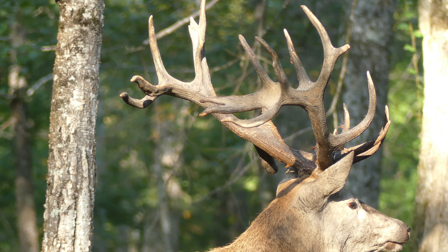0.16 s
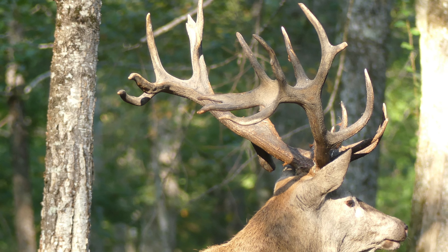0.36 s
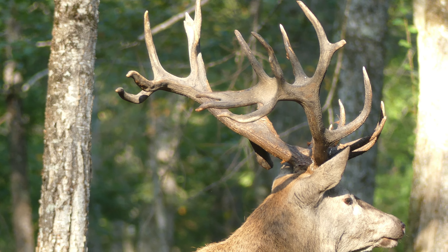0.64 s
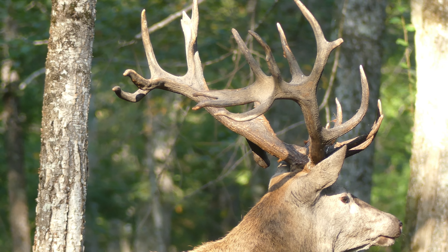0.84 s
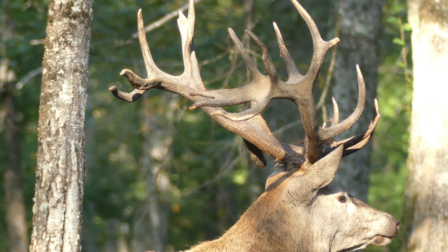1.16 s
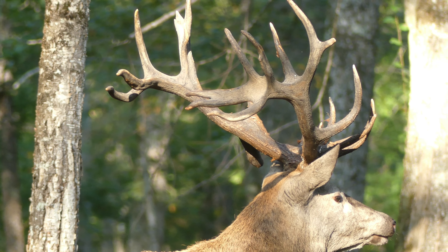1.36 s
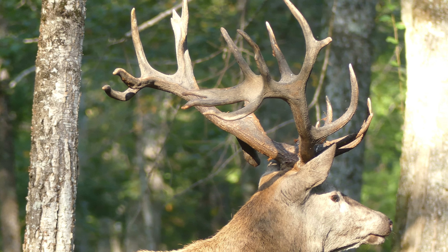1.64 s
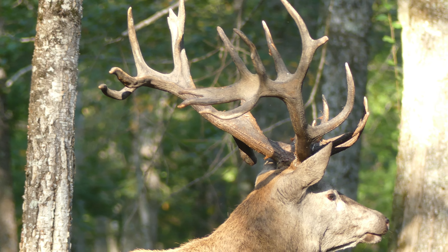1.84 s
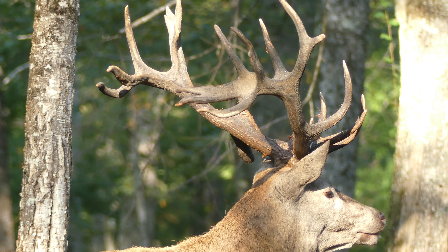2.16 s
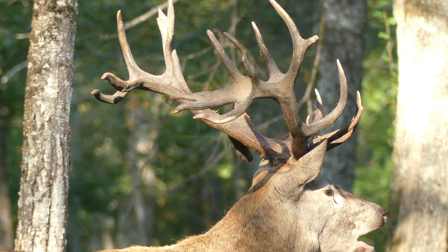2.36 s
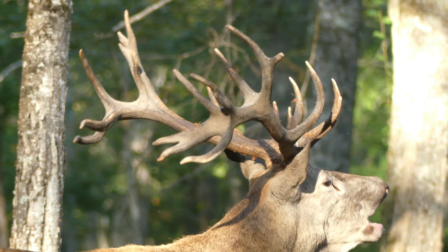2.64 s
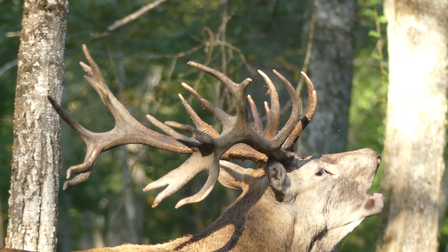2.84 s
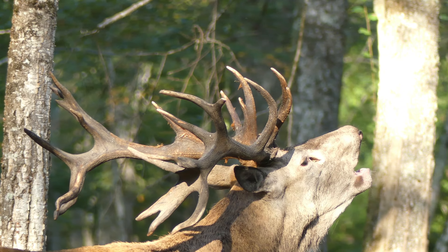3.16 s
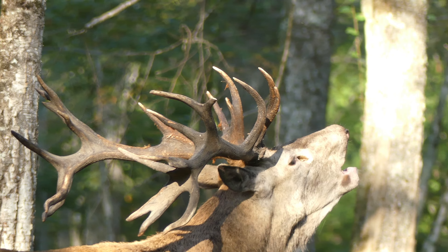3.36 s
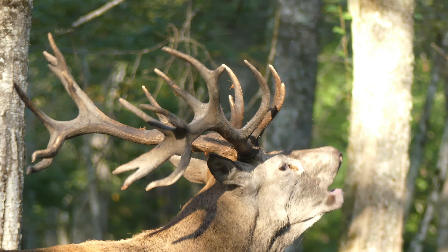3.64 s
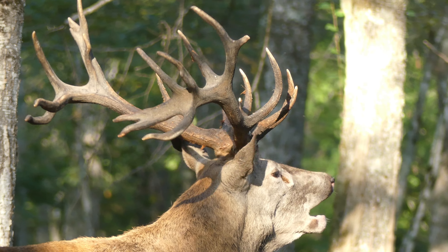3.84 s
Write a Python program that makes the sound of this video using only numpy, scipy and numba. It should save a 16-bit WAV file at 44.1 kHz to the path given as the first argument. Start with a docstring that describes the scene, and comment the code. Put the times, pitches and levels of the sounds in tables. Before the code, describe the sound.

After faint rumble, microphone hiss and barely audible insects, a single stag bellow starts muffled, opens with a nasal hiss, arches up in pitch and drops away, echoing off the trunks; heard clearly, mostly central.

```python
"""A quiet forest: far rumble, microphone hiss, faint insects and the fading echo of an earlier roar, all of
shaped noise. At 2.5 s a stag roars once: vocal fold pulses and breath excite chest and mouth resonances,
muffled at first. A nasal hiss joins and the mouth opens; the larynx drops, so most throat resonances sink
while the pitch arches up and falls. From 30 ms behind the voice the trunks answer with a long echo."""
import sys
import numpy as np
from scipy import signal
from scipy.fft import rfft, irfft, next_fast_len
from scipy.io import wavfile
from scipy.ndimage import uniform_filter1d, map_coordinates
from numba import njit

SR = 44100
rng = np.random.default_rng(int(sys.argv[2]) if len(sys.argv) > 2 else 0)


def nominal_scale(level):
    """Amplitude ratio for a level in decibels (scalar or array-like)."""
    x = np.asarray(level, float) / 20
    return 10 ** x


def bounce(signal):
    """Save signal as a 16-bit WAV file at the path given by the first command-line argument."""
    frames = np.transpose(np.atleast_2d(signal))
    limited = np.clip(frames, -1, 1)
    pcm = np.round(limited * 32767).astype(np.int16)
    wavfile.write(sys.argv[1], SR, pcm)


N = 176400  # samples, 4 s


def unit(x):
    """Normalisation: the signal scaled to rms 1."""
    return x / np.sqrt(np.mean(x ** 2) + 1e-20)


def along(points, hz):
    """Interpolation of (frequency [Hz], value) points on a logarithmic frequency axis."""
    f, value = np.transpose(points)
    return np.interp(np.log(hz + 1), np.log(f + 1), value)


def curves(rows):
    """Linear interpolation in time: one value per sample for each column after the time."""
    time, *columns = np.transpose(rows)
    return [np.interp(np.arange(N) / SR, time, column) for column in columns]


def wobble(rate):
    """Band-limited random modulation: a smooth curve through `rate` random knots a second."""
    knots = rng.standard_normal(int(N * rate / SR) + 4)
    return map_coordinates(knots, [np.arange(N) * rate / SR])


def filtered(x, response):
    """Linear filtering: the spectrum is multiplied by a response of frequency."""
    size = next_fast_len(N + SR // 2)
    hz = np.fft.rfftfreq(size, 1 / SR)
    return irfft(rfft(x, size) * response(hz), size)[..., :N]


def noise(response):
    """Spectral shaping: white noise coloured by a response, at rms 1."""
    return unit(filtered(rng.standard_normal(N), response))


# Pitch of the vocal folds: (time [s], pitch [Hz])
PITCH = [(2.52, 99.34), (2.662, 115.4), (2.7, 124.6), (2.74, 140.1), (2.786, 153.7), (2.874, 188.1),
         (2.904, 197.3), (3.026, 203.2), (3.06, 210.5), (3.104, 207.1), (3.248, 223.5), (3.3, 222),
         (3.362, 212.8), (3.452, 215.6), (3.504, 204.7), (3.544, 196.6), (3.598, 173.5), (3.655, 160.2),
         (3.692, 140.3), (3.762, 97.86), (3.8, 81.8)]


def vocal_folds(start, end):
    """Glottal excitation: periodic pulses, and turbulent noise that swells once a cycle with the folds."""
    jitter, shimmer_db = 0.004, 1.57  # scatter of pitch (fraction) and of pulse size (dB)
    pitch, = curves(PITCH)
    turns = np.cumsum(pitch * (1 + jitter * wobble(60))) / SR
    pitch, turns = pitch[start:end], turns[start:end]
    harmonic = np.arange(1, 45)[:, None]
    audible = harmonic * pitch < 7000  # Hz
    pulses = np.sum(np.cos(2 * np.pi * harmonic * turns) * audible, 0)
    pulses = unit(pulses * nominal_scale(shimmer_db * wobble(90)[start:end]))
    puffs = unit(rng.standard_normal(end - start) * (1.3 + np.cos(2 * np.pi * turns)))
    return pulses, puffs * np.sqrt(SR / 14000)  # about rms 1 within the 7 kHz band of the pulses


def blend(pulses, puffs, share):
    """Power addition of uncorrelated sources: breath takes `share` of the power."""
    return np.sqrt(1 - share) * pulses + np.sqrt(share) * puffs


@njit
def ring(x, turn, keep, gain):
    """Parallel resonance: steep two-stage resonators whose pitch may move from sample to sample."""
    out = np.zeros(len(x))
    for k in range(len(keep)):
        y = z = 0j
        for i in range(len(x)):
            y = y * keep[k] * turn[k, i] + x[i]
            z = z * keep[k] * turn[k, i] + y
            out[i] += gain[k, i] * z.real
    return out


def throat(source, table, shortness, lift_db=0):
    """Source-filter principle: resonances scale with throat shortness; the result is levelled over time."""
    hz, width, db = np.transpose(table)[..., None]
    keep = np.exp(-np.pi * width / SR)
    # alternating signs below 1500 Hz: neighbouring resonances cancel between their peaks
    sign = (-1.0) ** np.cumsum(hz < 1500, axis=0)
    gain = nominal_scale(db + lift_db + 0 * source) * (1 - keep) ** 2 * sign
    turn = np.exp(2j * np.pi * hz * shortness / SR)
    y = ring(source, turn, keep[:, 0], gain)
    power = uniform_filter1d(uniform_filter1d(y ** 2, size=2600), size=2600)
    return y / np.sqrt(np.abs(power) + 1e-20)


# Levels: (time [s], chest level [dB], mouth level [dB], strain: top resonances over the mouth level [dB])
ROAR = [(2.48, -47.5, -87, -23), (2.6, -44, -87, -32), (2.66, -33.5, -41.5, -20.5), (2.7, -33, -45, -28.5),
        (2.738, -24.5, -33, -14), (2.756, -28.5, -15, -28), (2.82, -24.5, -15.5, -19),
        (2.87, -14, -23, -21.5), (2.95, -17, -21, -15), (3.05, -17, -20, -15), (3.12, -17.5, -23, -8),
        (3.2, -23.5, -20, -7.5), (3.28, -23, -17, -14.5), (3.35, -26, -19, -10), (3.43, -26.5, -20, -14),
        (3.5, -22, -20.5, -8), (3.56, -18, -23.5, -22), (3.6, -9.5, -49.5, -21), (3.66, -20.5, -29.5, -5.5),
        (3.7, -20.5, -22, -11), (3.77, -15.5, -36, -12), (3.795, -17, -63, -11), (3.803, -74, -78, -9)]
# Breath in the source: (time [s], share of the power in the mouth tone [0-1])
BREATH = [(2.7, .15), (2.8, .11), (3.1, .06), (3.5, .035), (3.62, .05), (3.7, .12), (3.8, .1)]
# The larynx drops: (time [s], resonance pitch over that of the full-length throat [ratio])
SHORTNESS = [(2.6, 1.24), (2.76, 1.21), (2.82, 1.18), (2.87, 1.12), (2.95, 1.05), (3.1, 1.02), (3.3, 1.005),
             (3.55, 1.0)]
# Chest resonances at full length: (frequency [Hz], width of each stage [Hz], relative level [dB])
CHEST = [(186.2, 52.6, 11), (332.6, 119, 2)]
# Mouth resonances at full length: (frequency [Hz])
MOUTH_HZ = [445, 782, 1170, 1350, 1625, 1900, 2290, 2545]
# The same resonances: (width of each stage [Hz], relative level [dB],
# how strongly it follows the larynx [power of the ratio], gain per unit of extra shortness [dB])
MOUTH = [(86, -1, 1.2, -6.5), (70.2, 2, 1.195, -3), (85, -1.5, 0.56, 37), (76, -5, 0.6, -54),
         (84, 3, 0.95, 27), (82.5, 5, 1.12, 11), (161, -5, 0.66, 55), (130, -5, .5, 2)]
# Top resonances at full length: (frequency [Hz], width of each stage [Hz], relative level [dB])
TOP = [(2910, 250, 7.5), (3382, 244, 7.5), (3600, 195, 0.5), (4620, 260, -8), (5030, 520, -15),
       (6730, 1300, -25.5)]


def stag():
    """Source-filter voice: one glottal source drives chest, mouth and top resonances as the larynx drops."""
    chest_slide, top_slide = -0.15, 0.15  # powers of the ratio; a short throat pulls the chest tone down
    chest_breath, top_breath = 0.12, 3  # breath amplitude left in the chest; times the breath power on top
    start, end = round(ROAR[0][0] * SR), round(ROAR[-1][0] * SR)
    chest_db, mouth_db, strain_db = [curve[start:end] for curve in curves(ROAR)]
    share = curves(BREATH)[0][start:end]
    shortness = curves(SHORTNESS)[0][start:end]
    pulses, puffs = vocal_folds(start, end)

    chest_source = blend(pulses, puffs, share * chest_breath ** 2)
    chest = throat(chest_source, CHEST, shortness ** chest_slide)

    width, level, slide, lift = np.transpose(MOUTH)
    mouth = throat(blend(pulses, puffs, share), np.c_[MOUTH_HZ, width, level],
                   shortness ** slide[:, None], lift_db=lift[:, None] * (shortness - 1))

    top_source = blend(pulses, puffs, np.clip(top_breath * share, 0, 1))
    top = throat(top_source, TOP, shortness ** top_slide)

    voice = nominal_scale(chest_db) * chest + nominal_scale(mouth_db) * mouth + nominal_scale(mouth_db + strain_db) * top
    voice = np.pad(voice, (start, N - end))
    return filtered(voice, lambda hz: 1 / (1 + 85 / (1j * hz + 1e-9)) ** 6)  # six low cuts at 85 Hz


def snort():
    """Turbulence: a broad hiss of air through the nose as the roar opens."""
    start, rise, end = 2.62, 0.04, 2.9  # s
    level_db, centre_hz, width_hz = -46, 2480, 480
    t = np.arange(N) / SR
    shape = np.clip((t - start) / rise, 0, 1) * (t < end)
    hiss = noise(lambda hz: np.exp(-((hz - centre_hz) / width_hz) ** 2))
    return nominal_scale(level_db) * shape * hiss


# Decay of the echo: (frequency [Hz], time to fall by 60 dB [s])
ECHO = [(200, .8), (900, 2), (1600, 1), (1900, 2.6), (2300, .9), (5000, 1.1)]
# Colour of the echo at its onset: (frequency [Hz], relative level [dB])
ECHO_COLOUR = [(200, -6.5), (800, 3.5), (1900, -4), (2400, 0)]


def echo(x):
    """Scattering from trunks: convolution with a noise tail whose frequencies each die at their own speed."""
    gap = 0.03  # s
    hz, t, grains = signal.stft(rng.standard_normal(2 * SR), SR, nperseg=256)
    decay_db = along(ECHO_COLOUR, hz)[:, None] - 60 * t / along(ECHO, hz)[:, None]
    tail = signal.istft(grains * nominal_scale(decay_db), SR, nperseg=256)[1]
    delayed = np.pad(x, (round(gap * SR), 0))
    return signal.fftconvolve(delayed, tail / np.linalg.norm(tail))[:N]


# Echo of an earlier roar: (frequency [Hz], relative spectral density [dB])
EARLIER_ECHO = [(110, -46), (150, -8), (200, -1), (260, 0), (320, -13), (420, -46.5)]


def earlier_echo():
    """Reverberant decay: low narrow-band noise, the dying echo of an earlier roar."""
    start_db, fade = -40.5, 9  # dB, dB per s
    level_db = start_db - fade * np.arange(N) / SR
    return noise(lambda hz: nominal_scale(along(EARLIER_ECHO, hz))) * nominal_scale(level_db)


# Insect bands: (centre [Hz], half-width at 1/e of the amplitude [Hz], level before the swells [dB])
INSECTS = [(2310, 60, -65), (4030, 90, -68)]


def insects():
    """Amplitude modulation: two faint noise bands share one fast random pulsing."""
    swells, swell_db = 40, 4  # knots per s, depth in dB
    bands = 0
    for centre, width, db in INSECTS:
        bands = bands + nominal_scale(db) * noise(lambda hz: np.exp(-((hz - centre) / width) ** 2))
    return bands * nominal_scale(swell_db * wobble(swells))


# Far rumble and hiss: (frequency [Hz], relative spectral density [dB])
FOREST = [(15, -62.5), (25, -10), (45, 0), (90, 0.5), (125, -6.5), (200, -3), (245, -4.5), (307, -12),
          (413, -15), (1350, -21.5), (3500, -25.5), (4600, -28), (15700, -32.5)]
# Stereo side of the same: (frequency [Hz], side relative to mid [dB])
SIDE_SHARE = [(40, -32.5), (120, -32), (250, -34.5), (450, -18.5), (2400, -19.5), (5000, -14.5),
              (15000, -12.5)]


def forest():
    """Diffuse field: far rumble and hiss as uncorrelated mid and side noise; the mid wavers slightly."""
    level_db = -42
    colour = lambda hz: nominal_scale(along(FOREST, hz))
    mid = noise(colour) * nominal_scale(level_db + 0.2 * wobble(7.62))
    side = filtered(noise(colour), lambda hz: nominal_scale(along(SIDE_SHARE, hz))) * nominal_scale(level_db)
    return mid, side


# Colour of the small left-right disagreement that follows the voice: (frequency [Hz], added level [dB])
DISAGREEMENT = [(300, -15), (1500, -4.5), (4500, 17)]


def scene():
    """Mid/side superposition: nearly all is in the mid; a small left-right disagreement follows the voice."""
    echo_db = -2.5
    direct_disagreement_db, late_disagreement_db = -41, -38  # before the colour is added
    voice = stag() + snort()
    mid, side = forest()
    mid = mid + earlier_echo() + insects() + voice + nominal_scale(echo_db) * echo(voice)
    disagreement = nominal_scale(direct_disagreement_db) * voice + nominal_scale(late_disagreement_db) * echo(voice)
    side = side + filtered(disagreement, lambda hz: nominal_scale(along(DISAGREEMENT, hz)))
    return np.array([mid + side, mid - side])


def roll_off(x):
    """The treble ends steeply here."""
    return signal.sosfilt(signal.butter(12, 16160, fs=SR, output="sos"), x)


def record(dry):
    """Filtering and gain control: microphone notch, upper band limit, treble lowered while it is loud."""
    notch_hz, notch_width_hz, notch_depth, top_hz = 5880, 65, 0.99, 15790
    treble_hz, duck_db, duck_s = 6000, -4, 0.043
    duck_from_db, duck_range_db = -34, 6  # level where ducking begins, and the rise to full ducking

    def microphone(hz):
        notch = 1 - notch_depth * np.exp(-((hz - notch_hz) / notch_width_hz) ** 2)
        return notch * (hz < top_hz)

    x = filtered(dry, microphone)
    power = np.abs(uniform_filter1d(x[0] ** 2, round(duck_s * SR)))  # the left channel steers both
    loud_db = 10 * np.log10(power + 1e-12)
    duck = nominal_scale(duck_db * np.clip((loud_db - duck_from_db) / duck_range_db, 0, 1))
    treble = filtered(x, lambda hz: 1 / (1 + (treble_hz / (hz + 1)) ** 8))
    return roll_off(x + (duck - 1) * treble)


dry = scene()
out = record(dry)
bounce(out)
```